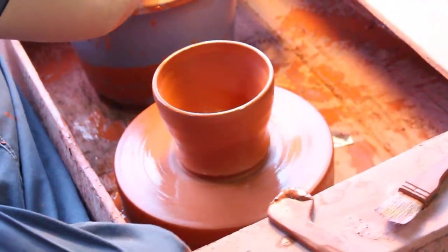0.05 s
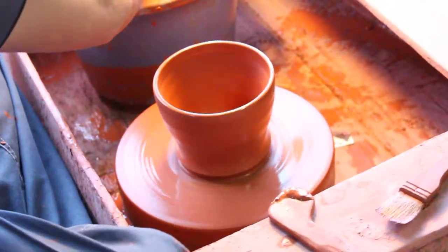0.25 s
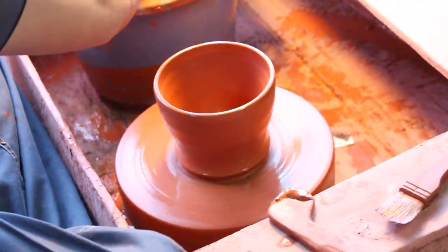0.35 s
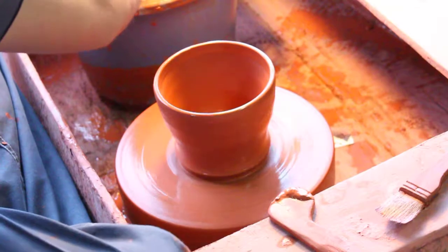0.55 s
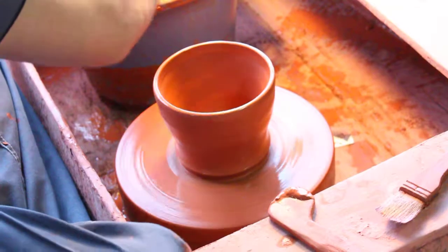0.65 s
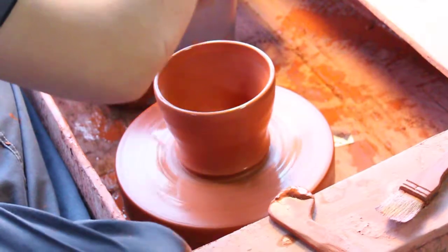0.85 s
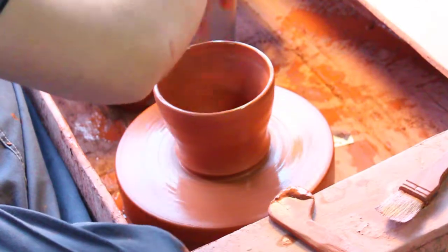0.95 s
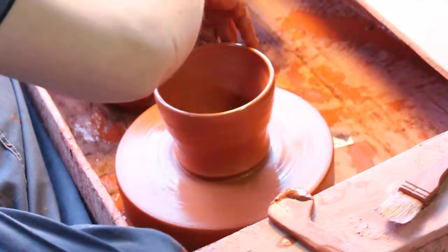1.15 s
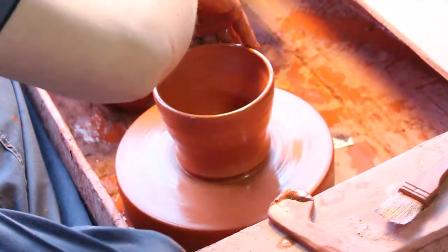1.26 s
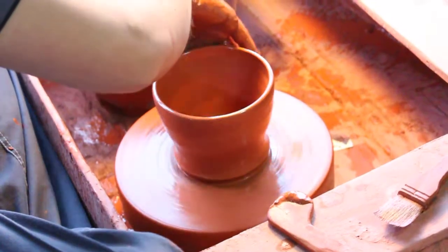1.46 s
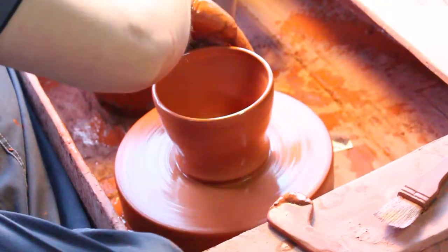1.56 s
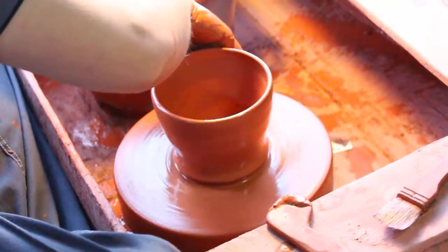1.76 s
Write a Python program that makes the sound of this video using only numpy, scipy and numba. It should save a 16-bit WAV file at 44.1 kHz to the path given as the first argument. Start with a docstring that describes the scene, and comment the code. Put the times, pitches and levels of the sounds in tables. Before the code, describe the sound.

A tool knocks down hard on a wooden board over a humming potter's wheel.

```python
"""A potter's wheel runs throughout in a small room: motor hum and whine over drive rumble and hiss.
Handling makes wet ticks and soft bumps on the board. At 0.25 s a tool touches and scrapes.
At 0.28 s it is set down hard: it chatters, cracks and briefly rings with the board.
The knock clips; gain control ducks and recovers. More bumps, ticks and small wet pings follow."""
import sys
import numpy as np
from scipy import signal
from scipy.fft import rfft, irfft
from scipy.io import wavfile
from numba import njit

SR = 44100
rng = np.random.default_rng(int(sys.argv[2]) if len(sys.argv) > 2 else 0)


def bounce(signal):
    """Save signal as a 16-bit WAV file at the path given by the first command-line argument."""
    frames = np.transpose(np.atleast_2d(signal))
    limited = np.clip(frames, -1, 1)
    pcm = np.round(limited * 32767).astype(np.int16)
    wavfile.write(sys.argv[1], SR, pcm)


N = 79380

# motor lines (frequency [Hz], rms level [dB], width [Hz])
MOTOR_LINES = [(131, -59, 20.7), (174.1, -45, 10.6), (239.4, -53, 16.6), (359.3, -50.5, 11.7),
               (441, -60.5, 11.8), (684, -50.5, 1.54), (764, -60.5, 11), (1316, -56.5, 8.3),
               (1426, -50.5, 24), (2290, -60, 40), (2390, -63.5, 47)]
# drive rumble and hiss (frequency [Hz], relative density [dB])
DRIVE_SPECTRUM = [(25, 4.5), (65, -10.5), (95, -0.5), (180, 1.5), (290, -8.5), (370, -8.5), (540, -12.5),
                  (720, -10), (1100, -16.5), (1450, -12.5), (1750, -19), (2350, -19.5), (2800, -25.5),
                  (4500, -29.5), (6000, -27.5), (7300, -35.5), (11000, -37.5), (15500, -36.5)]
DRIVE_DB, LINE_FLUTTER = -39.5, 0.38

# rubs and ticks of hands, clay, tools (time [s], level [dB], centre [Hz], width [oct], t60 [s])
TICKS = [(.001, -38, 6020, 0.47, 0.089), (0.019, -33.5, 2230, 0.59, 0.074), (0.031, -29, 1070, 0.71, 0.095),
         (0.035, -49, 8000, 1.4, 0.21), (0.092, -39.5, 1770, 0.63, .09), (0.117, -34.5, 1320, 0.55, 0.18),
         (0.157, -47.5, 3020, 1.05, 0.34), (0.621, -43, 3760, 0.46, 0.12), (0.653, -37.5, 1110, 0.6, 0.21),
         (0.67, -51, 14000, 0.2, 0.12), (.821, -32.5, 1360, 0.27, 0.086), (.852, -48, 1110, 0.82, 0.18),
         (1.02, -42, 1690, 0.25, 0.18), (1.035, -48.5, 3500, 0.6, 0.19), (1.21, -45, 12500, 0.85, .08),
         (1.215, -44, 4060, 0.42, 0.1), (1.262, -41, 970, 0.58, 0.22), (1.423, -51, 10400, 0.18, 0.053),
         (1.738, -52, 3500, 0.91, .05)]
TICK_RISE_S, TICK_ROOM_DB, GRAIN = 0.002, -6, 0.39

# bumps on the board (time [s], level [dB], t60 [s], roll-off corner [Hz])
BUMPS = [(.004, -30, 0.14, 300), (0.053, -30.5, 0.43, 950), (0.201, -23.5, 0.051, 460),
         (.212, -23, 0.33, 400), (.258, -17.5, 0.45, 700), (.309, -16, 0.27, 700),
         (0.329, -19.5, 0.085, 597), (.362, -20, 0.12, 660), (0.659, -31.5, 0.34, 204),
         (0.786, -35.5, 0.37, 280), (0.843, -24, 0.26, 1220), (0.863, -27.5, 0.059, 1170),
         (0.88, -32.5, 0.2, 1180), (0.927, -38, 0.16, 395), (1.042, -33.5, 0.35, 920),
         (1.172, -36, 0.12, 1240)]
# thud (frequency [Hz], relative density [dB])
THUD_SPECTRUM = [(30, -45), (60, -29), (90, -7), (170, -4), (240, 6), (300, -5.5), (460, -1.5), (550, -12),
                 (780, -7), (1000, -15), (1600, -14), (2600, -38)]
BUMP_RISE_S, BUMP_RING_DB, BUMP_RING_CORNER_HZ, BUMP_ROOM_DB = 0.00418, 9, 586, -4.5
# tool and board modes (frequency [Hz], relative level [dB], t60 [s])
MODES = [(128, -29, 0.54), (191, -18, 0.05), (243, -23, 0.06), (312, -18, 0.26), (360.25, -13, 0.18),
         (402.3, -12, 0.13), (454, -7.5, .11), (925, -8.5, 0.054), (1070, -15, 0.24), (1162, -5.5, 0.086),
         (1577, -20, 0.027), (1768, -12.5, 0.078), (1860, -24, 0.14), (2680, -15.5, 0.051),
         (3220, -22.5, 0.028), (3430, -35, 0.045), (4710, -31.5, 0.055), (4970, -33.5, 0.034),
         (6150, -51, 0.17), (6880, -37.5, 0.037), (8300, -45, 0.11), (8820, -41, 0.056),
         (11500, -56.5, 0.18), (13460, -57, 0.14)]

# light tool contacts (time [s], ring gain [dB], crack gain [dB], ring tilt [dB/oct])
TOUCHES = [(0.2482, -15, -12, 0.5), (0.2631, -15.5, -30, 0.5)]
# chatter of the main blow (ring gain [dB], crack gain [dB], ring tilt [dB/oct])
REBOUNDS = [(-1, 0, 5.5), (-1, 3, 5), (-1, 1, -5)]
BLOW_AT_S, REBOUND_GAP_S, CONTACT_RISE_S = 0.2843, 0.00436, 0.0015
TILT_PIVOT_HZ, RING_ROOM_DB = 1150, -13
# contact crack (frequency [Hz], relative density [dB])
CRACK_SPECTRUM = [(40, -37), (70, -38), (110, -1), (450, 1.5), (650, -4.5), (1600, 5), (2200, -4.5),
                  (3200, -13.5), (3800, -13.5), (5000, -16.5), (8600, -28), (10000, -29.5), (15500, -40)]
CRACK_DB, CRACK_T60_S, CRACK_ROOM_DB = -11, 0.086, -5

# edge scrapes (time [s], hold [s], level [dB])
SCRAPES = [(0.2597, 0.021, -23)]
# edge friction (frequency [Hz], relative density [dB])
SCRAPE_SPECTRUM = [(500, 5), (1500, 3.5), (3000, -0.5), (5500, -5), (7500, -4.5), (10000, -14),
                   (13000, -16), (15500, -19)]
SCRAPE_T60_S, SCRAPE_ROOM_DB = 0.079, -5

# wet pings (time [s], frequency [Hz], level [dB], t60 [s])
PINGS = [(.623, 3390, -39.5, 0.066), (1.038, 3236, -39, .04), (1.038, 4900, -46, 0.093),
         (1.216, 4340, -51, 0.068), (1.232, 3300, -44.5, 0.05)]

# room decay (frequency [Hz], t60 [s])
ROOM_DECAY = [(120, 0.7), (400, 0.35), (1200, 0.26), (4000, 0.29), (12000, 0.15)]
ROOM_RISE_S = 0.007
DUCK_ABOVE_DB, DUCK_ATTACK_S, DUCK_RELEASE_S, DUCK_SLOPE = -19.5, 0.022, 0.15, 0.83
LOW_CUT_HZ, HIGH_CUT_HZ = 59.5, 15750


def undb(db):
    return 10 ** (np.asarray(db) / 20)


def unit_rms(x):
    return x / np.sqrt(np.mean(x ** 2))


def along(hz, points):
    """Interpolate (frequency [Hz], value) points over log frequency."""
    p = np.array(points)
    return np.interp(np.log(hz), np.log(p[:, 0]), p[:, 1])


def rolloff(x, corner):
    """Two-pole low-pass gain."""
    return 1 / np.hypot(1, (x / corner) ** 2)


def noise(gain, grain=0.):
    """Unit-rms noise, spectrum gain(hz); grain roughens it into uneven clicks."""
    source = rng.standard_normal(N) * np.exp(grain * rng.standard_normal(N))
    hz = np.maximum(np.fft.rfftfreq(N, 1 / SR), 1)
    return unit_rms(irfft(rfft(source) * gain(hz), N))


def coloured(spectrum, grain=0.):
    """Noise shaped by a spectrum table."""
    return noise(lambda hz: undb(along(hz, spectrum)), grain)


def envelope(start_s, rise_s, t60_s, hold_s=0.):
    """Linear rise, hold, exponential decay."""
    t = np.arange(N) / SR - start_s
    decay = np.exp(-np.log(1000) * np.maximum(t - rise_s - hold_s, 0) / t60_s)
    return np.clip(t / rise_s, 0, 1) * decay


def wheel():
    """Wavering motor lines over steady drive rumble and hiss."""
    t = np.arange(N) / SR
    drift = lambda rate_hz: noise(lambda hz: 1 / (1 + (hz / rate_hz) ** 2))
    out = undb(DRIVE_DB) * coloured(DRIVE_SPECTRUM)
    for hz, db, width_hz in MOTOR_LINES:
        wander_cycles = np.cumsum(drift(width_hz)) * width_hz / 2 / SR
        line = np.sin(2 * np.pi * (hz * t + wander_cycles + rng.random()))
        flutter = 1 + LINE_FLUTTER * drift(2 * width_hz)
        out += undb(db) * unit_rms(line * flutter)
    return out


def ticks():
    """Hands, clay and tools rub and tick: bursts of grainy band noise."""
    out = np.zeros(N)
    for start_s, db, centre_hz, width_oct, t60_s in TICKS:
        grains = noise(lambda hz: rolloff(np.log2(hz / centre_hz), width_oct), GRAIN)
        out += undb(db) * grains * envelope(start_s, TICK_RISE_S, t60_s)
    return out


def bumps():
    """Soft bumps thud and stir the board's low modes."""
    out = np.zeros(N)
    for start_s, db, t60_s, corner_hz in BUMPS:
        thud = noise(lambda hz: undb(along(hz, THUD_SPECTRUM)) * rolloff(hz, corner_hz))
        out += undb(db) * thud * envelope(start_s, BUMP_RISE_S, t60_s)
        softness = lambda hz: rolloff(hz, corner_hz) * rolloff(hz, BUMP_RING_CORNER_HZ)
        out += ring(start_s + BUMP_RISE_S, lambda hz: undb(db + BUMP_RING_DB) * softness(hz))
    return out


def ring(start_s, gain):
    """One contact drives each tool and board mode by gain(hz)."""
    t, out = np.arange(N) / SR - start_s, np.zeros(N)
    for hz, db, t60_s in MODES:
        amplitude = undb(db) * gain(hz)
        if amplitude > 1e-3:
            out += amplitude * np.sin(2 * np.pi * hz * t) * envelope(start_s, CONTACT_RISE_S, t60_s)
    return out


def knock():
    """Two touches, then a chattering blow; each cracks and rings the same modes into the room."""
    rings, cracks = np.zeros(N), np.zeros(N)
    blow = [(BLOW_AT_S + k * REBOUND_GAP_S, *row) for k, row in enumerate(REBOUNDS)]
    for start_s, ring_db, crack_db, tilt_db_oct in TOUCHES + blow:
        rings += ring(start_s, lambda hz: undb(ring_db + tilt_db_oct * np.log2(hz / TILT_PIVOT_HZ)))
        burst = coloured(CRACK_SPECTRUM) * envelope(start_s, CONTACT_RISE_S, CRACK_T60_S)
        cracks += undb(CRACK_DB + crack_db) * burst
    return room(rings, RING_ROOM_DB) + room(cracks, CRACK_ROOM_DB)


def scrape():
    """The tool's edge drags just before the blow: grainy friction noise."""
    out = np.zeros(N)
    for start_s, hold_s, db in SCRAPES:
        friction = coloured(SCRAPE_SPECTRUM, GRAIN)
        out += undb(db) * friction * envelope(start_s, CONTACT_RISE_S, SCRAPE_T60_S, hold_s)
    return out


def pings():
    """Small wet pings: damped sines."""
    t, out = np.arange(N) / SR, np.zeros(N)
    for start_s, hz, db, t60_s in PINGS:
        out += undb(db) * np.sin(2 * np.pi * hz * (t - start_s)) * envelope(start_s, TICK_RISE_S, t60_s)
    return out


def room(x, wet_db):
    """Add a diffuse tail; treble dies first."""
    spectrum, hz = rfft(rng.standard_normal(N)), np.fft.rfftfreq(N, 1 / SR)
    centres_hz, tail = np.geomspace(60, 15000, 9), np.zeros(N)
    for centre_hz, weights in zip(centres_hz, np.eye(len(centres_hz))):
        band = irfft(spectrum * np.interp(hz, centres_hz, weights), N)
        tail += band * envelope(0, ROOM_RISE_S, along(centre_hz, ROOM_DECAY))
    return x + undb(wet_db) * signal.fftconvolve(x, tail / np.linalg.norm(tail))[:N]


def scene():
    """Wheel under handling and tool; mono."""
    out = wheel()
    out += room(ticks() + pings(), TICK_ROOM_DB) + room(bumps(), BUMP_ROOM_DB)
    out += knock() + room(scrape(), SCRAPE_ROOM_DB)
    return out[None]


@njit
def follow(x, attack, release):
    """One-pole level follower; coefficients per sample."""
    out, level = np.empty(len(x)), 0.
    for i in range(len(x)):
        level += (x[i] - level) * (attack if x[i] > level else release)
        out[i] = level
    return out


def record(dry):
    """Low cut, ducking gain control, hard clip, high cut."""
    x = signal.sosfilt(signal.butter(3, LOW_CUT_HZ, "high", fs=SR, output="sos"), dry[0])
    level = follow(np.abs(x), 1 / (DUCK_ATTACK_S * SR), 1 / (DUCK_RELEASE_S * SR))
    reduction = np.maximum(level / undb(DUCK_ABOVE_DB), 1) ** DUCK_SLOPE
    x = np.clip(x / reduction, -1, 1)
    return signal.sosfilt(signal.ellip(10, .1, 70, HIGH_CUT_HZ, fs=SR, output="sos"), x)[None]


dry = scene()
out = record(dry)
bounce(out)
```